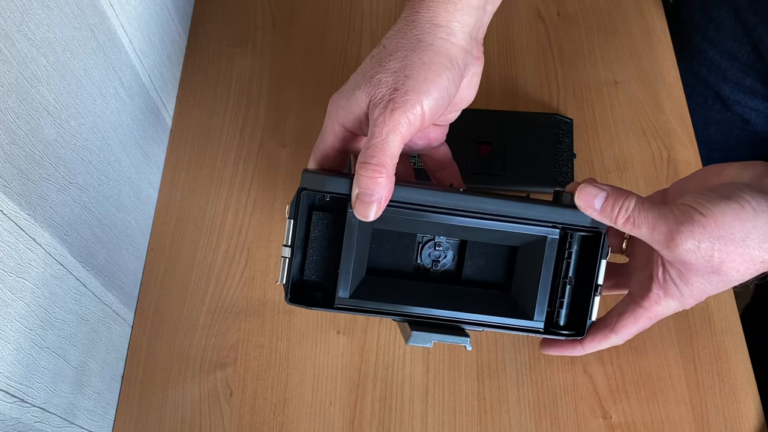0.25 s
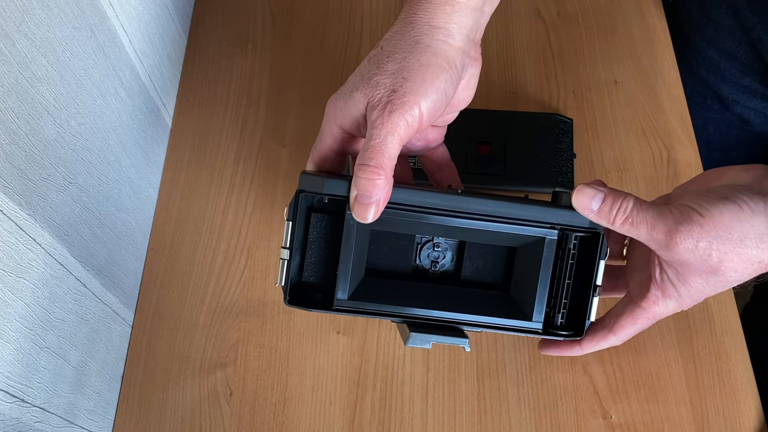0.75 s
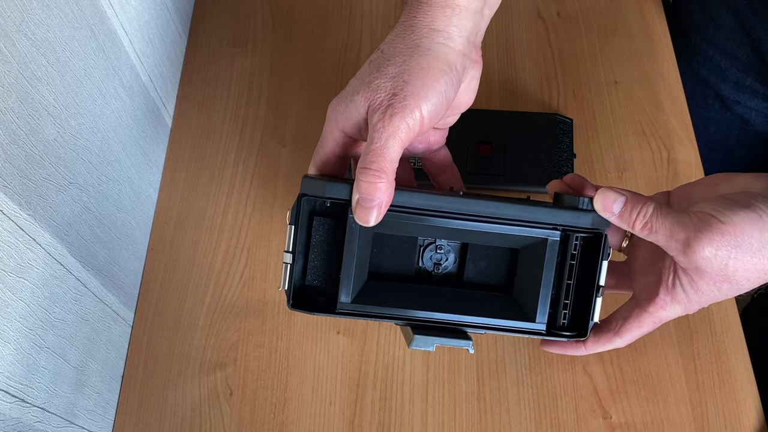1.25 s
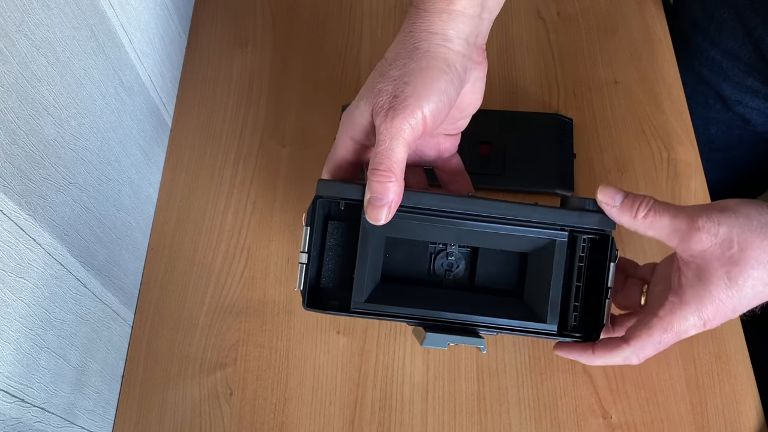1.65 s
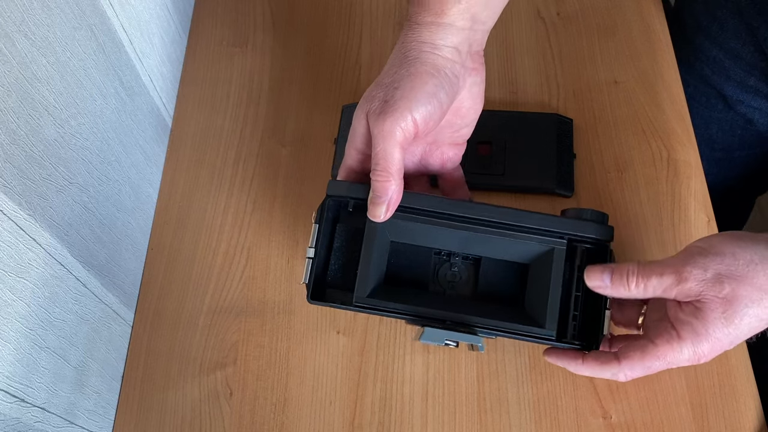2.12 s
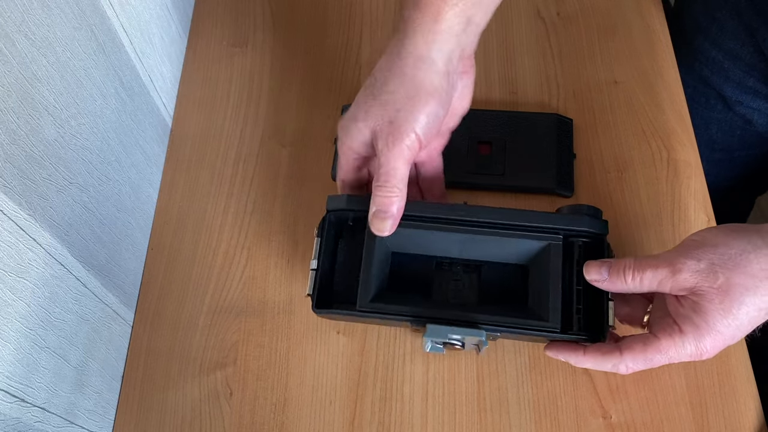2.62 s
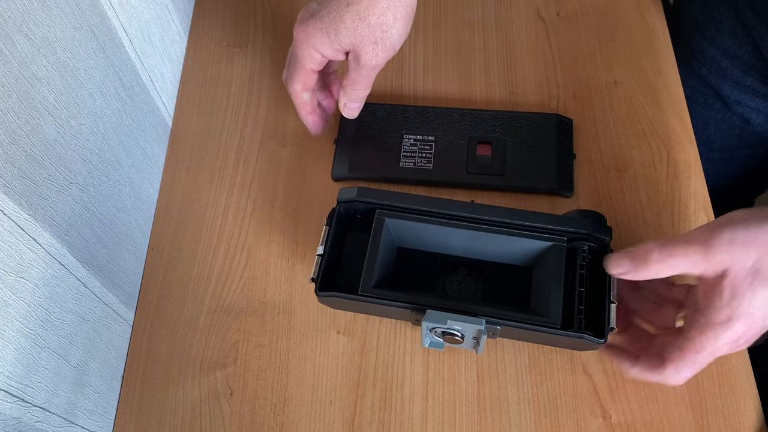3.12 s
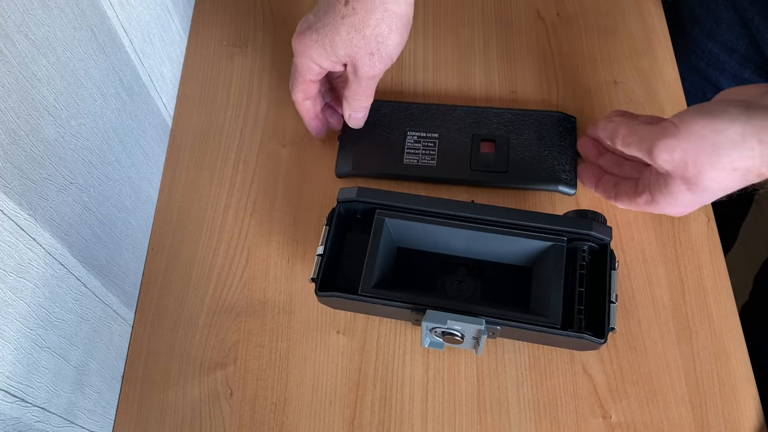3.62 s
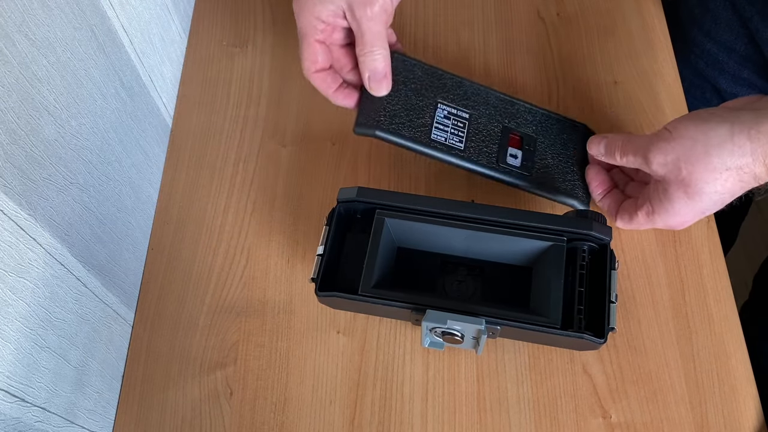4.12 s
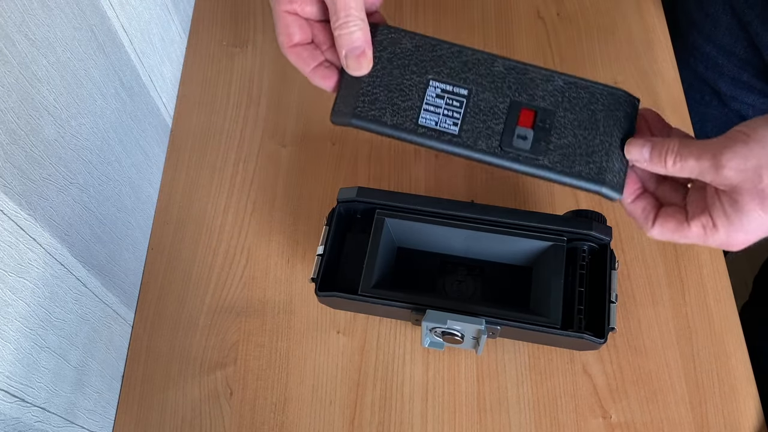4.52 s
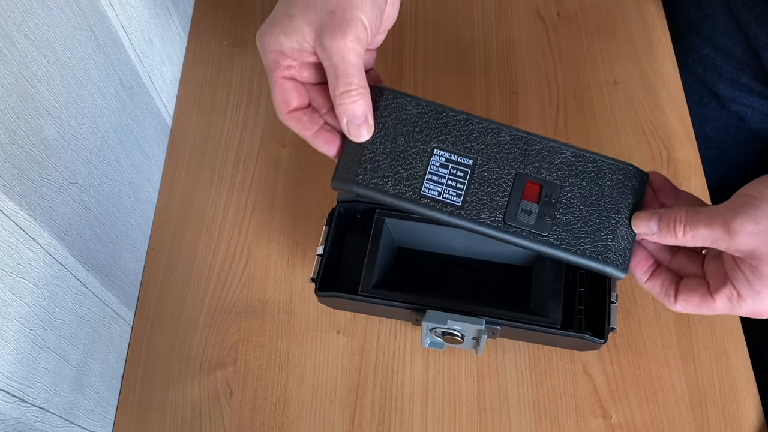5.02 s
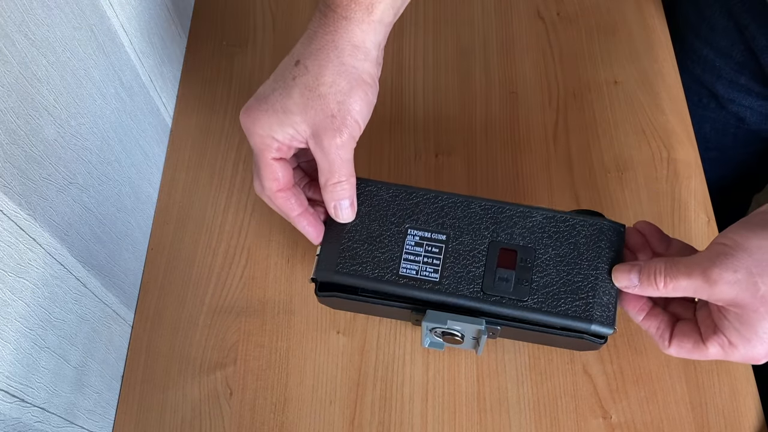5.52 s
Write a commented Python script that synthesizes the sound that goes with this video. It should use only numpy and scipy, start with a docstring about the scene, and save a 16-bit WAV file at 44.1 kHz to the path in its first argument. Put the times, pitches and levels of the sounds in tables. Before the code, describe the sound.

A small camera's advance wheel gives sharp ratchet clicks, then the body bumps on a wooden table and its plastic back clacks.

```python
"""Seven sharp clicks in two short runs, close to the microphone: the advance wheel of an old roll-film
camera is turned and its pawl snaps over the teeth. The body is set down and rocks on a wooden table.
Fingers then slide to the loose plastic back, which clacks as it is picked up and is laid softly on
the body. A stereo microphone hears it all at the table, in a small, quiet room with a low rumble."""
import sys
import numpy as np
from scipy import signal
from scipy.fft import rfft, irfft, next_fast_len
from scipy.io import wavfile

SR = 44100
rng = np.random.default_rng(int(sys.argv[2]) if len(sys.argv) > 2 else 0)


def master(y):
    """Save y as 16-bit WAV."""
    cut = np.clip(np.atleast_2d(y).T, -1, 1)
    pcm = np.round(cut * 32767)  # scale
    wavfile.write(sys.argv[1], SR, pcm.astype(np.int16))


N = 254180
TIME = np.arange(N) / SR
HIT_TIME = TIME[:SR // 2]   # half a second for one impact to ring out

# the pawl drops off a tooth: t/s, level/dB, housing ring/dB, spring ring/dB, pawl ring/dB, shaft rasp/dB
PAWL_DROPS = [(0.2750, -0.5, 6, 5.5, 2.5, -54.5), (0.3490, 0.5, 4, -3.5, 0, -47.5),
              (0.4212, 2.1, 3, 5.5, -1.5, -53), (0.899, -1, 4, 2.5, -0.5, -55), (1.0154, 1.3, 1, 3, 0, -56),
              (1.1080, 2.2, 6.5, 0, -4, -64), (1.1934, -2, 5.5, 0, -2.5, -39)]
# colour of the pawl's broad crack: f/Hz, level/dB
PAWL_CRACK = [(100, -23), (400, -17), (800, -13), (2500, -6.5), (6000, -8.5), (9000, -5), (11500, -9),
              (13200, 1), (14700, 2), (16000, -32)]
# modes of the camera housing: f/Hz, width/Hz, level/dB
HOUSING_MODES = [(673, 21, -2.5), (988, 34, -1), (1320, 69, -3), (1527, 41, -4.5), (1970, 110, -10.5),
                 (2260, 82, 2), (2610, 290, -6.5)]
# modes of the back's plastic shell: f/Hz, width/Hz, level/dB
SHELL_MODES = [(662, 76, -5), (784.5, 6.9, -0.5), (1033, 18, 6), (1138, 22, 0.5), (1226, 27, 4.5),
               (2093, 22, 9), (2260, 16, -2.5), (2320, 60, 3), (2880, 75, -12.5), (3090, 28, 6),
               (3640, 44, -5.5), (3673, 126, 0), (3650, 163, 6), (4620, 130, -7), (4940, 90, -7.5),
               (5800, 160, -32)]


def ratchet(crack_s=0.0034, clatter_s=0.014, slide_s=0.0006):
    """The pawl scrapes over a tooth and snaps down: its spring pings high, the housing answers lower."""
    # modes of the pawl and of its spring: f/Hz, width/Hz, level/dB
    pawl_modes = [(3550, 184, -35), (4070, 110, 0), (5060, 240, 2), (5300, 68, -6.5), (7200, 127, 7),
                  (8820, 190, -0.5), (10300, 194, -4.5), (11670, 450, 4)]
    spring_modes = [(12900, 150, 4.4), (13420, 580, 4.9), (14430, 380, 11.5), (15570, 280, 10.6),
                    (15330, 450, 10.8)]
    out, lead = np.zeros(N), SR // 100
    for s, db, housing_db, spring_db, pawl_db, _ in PAWL_DROPS:
        force = contact(chatter=0.66, seconds=0.00056)
        slide = from_db(-7) * noise(PAWL_CRACK, lead) * fade(slide_s)[:lead][::-1]   # swells to the snap
        crack = from_db(1) * noise(PAWL_CRACK, len(force)) * fade(crack_s)
        clatter = from_db(-1) * soften(noise(PAWL_CRACK, len(force)) * fade(clatter_s), cut_hz=1900)
        housing = from_db(housing_db) * (resonate(force, HOUSING_MODES, spread_db=1) + clatter)
        spring = from_db(spring_db) * resonate(force, spring_modes, spread_db=4)
        pawl = from_db(pawl_db) * resonate(force, pawl_modes, spread_db=1)
        snap = np.concatenate([slide, crack + pawl + housing + spring])
        # each click is scaled to its listed level
        add(out, s - lead / SR, from_db(db) * snap / np.linalg.norm(snap))
    return out


def wheel_play(climb_s=0.051, climb_lead_s=0.002):
    """The shaft rasps as the pawl climbs and the spool drags; wheel and spool tick on the housing."""
    # the spool drags round between teeth: peak t/s, length/s, level/dB
    spool_drags = [(0.942, 0.033, -50.5), (1.15, 0.041, -45), (1.503, .085, -54), (1.58, .08, -64.5),
                   (1.66, 0.026, -61), (1.77, 0.06, -67.5)]
    # wheel and spool knock in their play: t/s, level/dB
    ticks = [(0.224, -21.5), (0.990, -9), (1.082, -11.5), (1.148, -17), (1.181, -9), (1.407, -16),
             (1.659, -27)]
    # resonances of the rasping shaft: f/Hz, width/Hz, level/dB
    rasp_modes = [(958, 75, -5.5), (1300, 90, -6), (1630, 166, -4.5), (1980, 250, -3.5), (2306, 72, 2.5),
                  (3030, 1160, -14)]
    climbs = [(s - climb_lead_s, climb_s, rasp_db) for s, *_, rasp_db in PAWL_DROPS]
    out = rms_one(resonate(slips(), rasp_modes)) * (strokes(climbs) + strokes(spool_drags))
    for s, db in ticks:
        force = contact(chatter=1, seconds=0.007)
        grit = 0.59 * noise(PAWL_CRACK, len(force)) * fade(0.0057)
        ring = resonate(force, HOUSING_MODES, spread_db=3)
        add(out, s, from_db(db) * soften(ring + grit, cut_hz=1000))
    return out


def shell_knocks(crack_s=0.0066):
    """The loose back clacks on the table, then on the body; gripping fingers damp its panel."""
    # knocks of the shell: t/s, level/dB, contact brightness/Hz, panel ring/dB
    knocks = [(3.7102, -11, 3420, 0), (3.7217, -4, 3540, 3), (3.8063, -1, 3900, -2),
              (3.832, 5.5, 7560, 1.5), (3.8370, -6, 4500, -7), (3.8490, 1.5, 4500, -0.5),
              (3.8630, -2.5, 4520, 1), (5.643, -23.5, 2970, -21), (5.687, -39, 2980, 5)]
    # colour of the plastic's broad crack: f/Hz, level/dB
    crack_colour = [(100, -5), (400, -36), (900, -21.5), (1700, -2), (2700, -11.5), (3800, -9), (7000, -17),
                    (11000, -18), (15000, -17)]
    # modes of the back's flat panel: f/Hz, width/Hz, level/dB
    panel_modes = [(1530, 34, -11), (1614, 20, -2), (1680, 17, 1.5), (1748, 45, -8)]
    out = np.zeros(N)
    for s, db, bright_hz, panel_db in knocks:
        force = contact(chatter=0.5, seconds=0.0008)
        crack = from_db(2) * noise(crack_colour, len(force)) * fade(crack_s)
        shell = resonate(force, SHELL_MODES, spread_db=2.2)
        panel = from_db(15 + panel_db) * resonate(force, panel_modes, spread_db=1.8)
        add(out, s, from_db(db) * soften(shell + panel + crack, bright_hz))
    return out


def table_thumps(rock_count=5, rock_boom_db=-8):
    """The camera rocks from edge to edge, ever weaker; close modes of the table top swell and beat."""
    # the camera is set down: t/s, level/dB, time between rocks/s, loss per rock/dB
    landings = [(2.341, 3.5, .062, 6.5), (2.779, 1.5, .056, 7.5)]
    # single bumps on the top: t/s, level/dB, boom relative to that level/dB
    bumps = [(2.709, -4, -7), (2.75, -3, -7), (3.336, -18.5, 24), (3.714, -38, -2), (3.83, -7, 27.5),
             (5.648, -19.5, 19)]
    # modes of the top and of its lingering boom: f/Hz, width/Hz, level/dB
    top_modes = [(87, 16.7, 10.5), (153.1, 9.9, 25), (177, 14.2, 24), (218.7, 30.6, 6.5)]
    boom_modes = [(158.7, 5.6, 4.5)]
    rocks = [(s + k * gap_s, db - k * loss_db, rock_boom_db)
             for s, db, gap_s, loss_db in landings for k in range(rock_count)]
    pushes, booms = np.zeros((2, N))
    for s, db, boom_db in rocks + list(bumps):
        add(pushes, s, from_db([db]))
        add(booms, s, from_db([db + boom_db]))
    return soften(resonate(pushes, top_modes) + resonate(booms, boom_modes), cut_hz=830)


def body_taps():
    """The camera's edges give short, woody taps on the table."""
    # an edge touches the wood: t/s, level/dB
    taps = [(2.337, -23.5), (2.427, -25.5), (2.707, -16), (2.782, -24.5), (3.3362, -17)]
    # modes of the tapped wood: f/Hz, width/Hz, level/dB
    wood_modes = [(314, 91, -1), (430, 140, 1.5), (630, 46, 5.5), (954, 200, 3.5), (1250, 90, -10),
                  (1360, 100, -2.5), (1870, 800, -3.5), (3300, 520, -20)]
    out = np.zeros(N)
    for s, db in taps:
        force = contact(chatter=1, seconds=0.03)
        add(out, s, from_db(db) * resonate(force, wood_modes, spread_db=2.5))
    return out


def rubbing(squeak_db=3.5):
    """Sliding fingers: tiny slips ring the shell and squeak, the table murmurs, the skin hisses."""
    # fingertips on the back, hands on the table, dry skin on the covering: peak t/s, length/s, level/dB
    shell_slides = [(3.555, 0.11, -50), (4.164, 0.05, -50)]
    table_brushes = [(3.183, 0.088, -55.5), (3.355, 0.083, -53.5), (3.45, 0.11, -56.5), (3.54, 0.12, -47),
                     (3.72, 0.11, -48.5), (3.88, 0.2, -58.5), (4.17, .14, -65.5)]
    skin_wipes = [(1.52, .18, -69), (2.40, 0.05, -65.5), (2.71, 0.073, -67), (3.57, 0.19, -68),
                  (4.04, 0.12, -58.5), (4.15, 0.06, -60), (4.52, 0.046, -64.5), (5.095, 0.088, -72.5),
                  (5.28, 0.13, -86), (5.40, .09, -89)]
    # a fingertip squeaks on the panel's edge: f/Hz, width/Hz, level/dB
    squeak_modes = [(1548, 30, 9), (1660, 250, -5.5), (1990, 130, -1), (3340, 190, -8)]
    # friction colours of table and skin: f/Hz, level/dB
    table_colour = [(60, -21), (150, -1), (240, -2), (330, -7), (450, -17), (700, -16.5), (1200, -26),
                    (4000, -44), (12000, -60)]
    skin_colour = [(300, -2), (1500, 11.5), (4000, 2), (7000, 2.5), (10000, 4), (13000, 1), (15000, 6),
                   (16500, -17)]
    force = slips()
    shell = rms_one(soften(resonate(force, SHELL_MODES), cut_hz=370))
    squeak = from_db(squeak_db) * rms_one(resonate(force, squeak_modes))
    table = rms_one(noise(table_colour)) * strokes(table_brushes)
    skin = rms_one(noise(skin_colour)) * strokes(skin_wipes)
    return (shell + squeak) * strokes(shell_slides) + table + skin


def room_response(scatter_s=0.012, first_s=0.0022, table_echo_s=0.01, table_echo_db=-17):
    """Scatter from table and hands, an early echo off the table top, a tail whose treble dies first."""
    # reverberation of the small room: f/Hz, time to fall 60 dB/s
    room_t60 = [(150, 0.41), (1000, 0.55), (2500, 0.31), (6000, 0.35), (11000, 0.21), (15000, 0.17)]
    centres = np.geomspace(100, 16000, 9)
    white, tail = rng.standard_normal((2, len(HIT_TIME))), 0
    for hz, share in zip(centres, np.eye(len(centres))):
        band = shaped(white, lambda f: at_hz(list(zip(centres, share)), f))
        tail = tail + band * fade(at_hz(room_t60, hz) / np.log(1000))
    scatter = rng.standard_normal(white.shape) * fade(scatter_s)
    response = diffuse(*(from_db(-6) * tail + from_db(-9) * scatter))
    response = np.pad(response, ((0, 0), (round(first_s * SR), 0)))
    response[:, round(table_echo_s * SR)] += from_db(table_echo_db)
    return response


def diffuse(mid, side):
    """Two unrelated signals become the room's stereo field."""
    # reflections at the microphone: f/Hz, left-right likeness/0..1
    likeness = [(60, .85), (170, .65), (300, .1), (1000, 0), (7500, .1), (9000, .8), (11000, .94),
                (15000, .96)]
    mid = shaped(mid, lambda hz: np.sqrt((1 + at_hz(likeness, hz)) / 2))
    side = shaped(side, lambda hz: np.sqrt((1 - at_hz(likeness, hz)) / 2))
    return mid + side * [[1], [-1]]


def microphone_ports(x):
    """Sound from the table reaches the two microphone ports with different phase and level."""
    # left port against right: f/Hz, phase lead/rad
    phase = [(0, 0), (1200, .3), (4800, 1.0), (6200, 0), (7400, -.6), (8300, -3.2), (9500, -5),
             (13400, -9.4), (15700, -12.5)]
    # left port against right: f/Hz, level/dB
    balance = [(40, 0), (170, -1.3), (400, .5), (1600, 2.2), (2400, -.5), (3500, 1.8), (5500, 3), (8000, 0)]
    sides = np.array([[1], [-1]]) / 2
    turn = lambda hz: np.exp(1j * sides * np.interp(hz, *np.transpose(phase)))
    return shaped(x, lambda hz: from_db(sides * at_hz(balance, hz)) * turn(hz))


def room_tone(rumble_db=-50.5, air_db=-67.5):
    """Low rumble and faint air of the room, nearly centred."""
    # colours of rumble and air: f/Hz, level/dB
    rumble = [(4, -14), (11, 0), (18, -4.5), (28, -7.5), (45, -24), (70, -20), (110, -31.5), (170, -35.5),
              (300, -61), (1000, -69.5)]
    air = [(60, -1.5), (180, 5), (430, -1.5), (640, 2.5), (850, -3.5), (1800, -6), (2300, -4.5),
           (3000, -8.5), (6000, -15.5), (10000, -20), (14500, -28), (15500, -52.5)]
    # stereo width: f/Hz, side against mid/dB
    width = [(30, -38), (70, -31.5), (120, -27.5), (400, -13.5), (1400, -17), (2500, -47.5), (8000, -22),
             (14000, -15)]
    mid, side = [from_db(rumble_db) * rms_one(noise(rumble)) + from_db(air_db) * rms_one(noise(air))
                 for _ in range(2)]
    return mid + shaped(side, lambda hz: from_db(at_hz(width, hz))) * [[1], [-1]]


def contact(chatter, seconds):
    """One sharp impact followed by a brief chatter of the touching faces."""
    force = chatter * rng.standard_normal(len(HIT_TIME)) * fade(seconds)
    force[0] = 1
    return force


def slips(grain_db=6, clump=100):
    """Friction force: tiny slips in clumps of uneven strength, each `clump` samples long."""
    force = rng.standard_normal(N)
    clump_db = grain_db * rng.standard_normal(N // clump + 1)
    return force * from_db(np.repeat(clump_db, clump)[:N])


def strokes(rows, swell_share=0.43, end_drop_db=16):
    """Gain over time of rubs: each swells to its peak and dies away, evenly in decibels."""
    gain = 0
    for s, length, db in rows:
        away = np.maximum((s - TIME) / swell_share, (TIME - s) / (1 - swell_share)) / length
        gain = gain + from_db(db - end_drop_db * np.minimum(away, 10))
    return gain


def resonate(x, modes, spread_db=0):
    """Parallel resonances of alternating sign; spread_db varies their weights from blow to blow."""
    out = 0
    for k, (hz, width, db) in enumerate(modes):
        r = np.exp(-np.pi * width / SR)
        poles = [1, -2 * r * np.cos(2 * np.pi * hz / SR), r * r]
        mode = signal.lfilter([1, 0, -1], poles, x + 1e-18) * (1 - r * r) / 2
        out = out + (-1) ** k * from_db(db + spread_db * rng.standard_normal()) * mode
    return out


def soften(x, cut_hz):
    """Gentle loss of treble, as from a softer contact."""
    return signal.sosfilt(signal.butter(1, cut_hz, fs=SR, output="sos"), x)


def fade(seconds):
    """Exponential decay of unit energy."""
    shape = np.exp(-HIT_TIME / seconds)
    return shape / np.linalg.norm(shape)


def noise(colour, size=N):
    """Noise coloured by rows of f/Hz, level/dB."""
    return shaped(rng.standard_normal(size), lambda hz: from_db(at_hz(colour, hz)))


def shaped(x, gain_at):
    """Filter by a gain that is a function of frequency."""
    size = next_fast_len(x.shape[-1] + SR // 10)
    hz = np.arange(size // 2 + 1) * SR / size
    return irfft(rfft(x, size) * gain_at(hz), size)[..., :x.shape[-1]]


def at_hz(points, hz):
    """Read a table along log frequency."""
    f, value = np.transpose(points)
    return np.interp(np.log(np.maximum(hz, 1)), np.log(f), value)


def from_db(db):
    """Decibels to gain."""
    return 10 ** (np.asarray(db) / 20)


def rms_one(x):
    """Scale to unit power."""
    return x / np.sqrt(np.mean(x ** 2) + 1e-20)


def add(track, s, sound):
    """Mix a sound in at s seconds."""
    start = round(s * SR)
    track[start:start + len(sound)] += sound[:N - start]


def scene(handling_send_db=-1, table_send_db=-6, room_cut_hz=11000):
    """Camera and table close to the microphone, the room's reflections and tone behind them."""
    wheel = ratchet() + wheel_play()
    handling = shell_knocks() + body_taps() + rubbing()
    table = table_thumps()
    sent = wheel + from_db(handling_send_db) * handling + from_db(table_send_db) * table
    room = signal.fftconvolve(soften(sent, room_cut_hz)[None], room_response(), axes=1)[:, :N]
    return microphone_ports(wheel + handling + table + room) + room_tone()


def record(dry, cutoff_hz=16300):
    """A steep low-pass takes off the highest treble."""
    return signal.sosfilt(signal.ellip(8, .1, 80, cutoff_hz, fs=SR, output="sos"), dry)


dry = scene()
out = record(dry)
master(out)
```